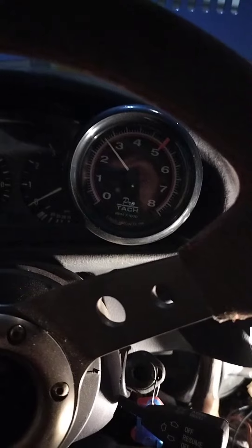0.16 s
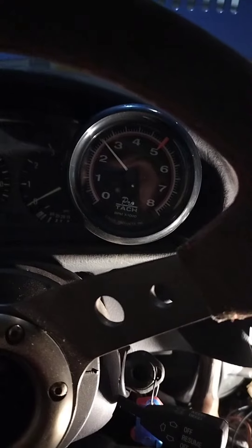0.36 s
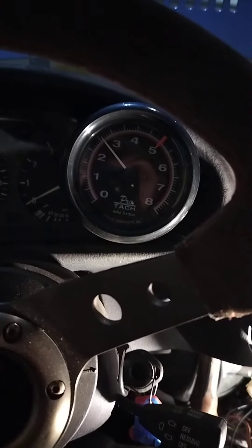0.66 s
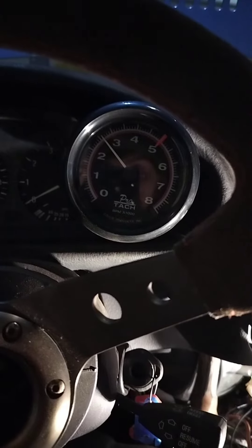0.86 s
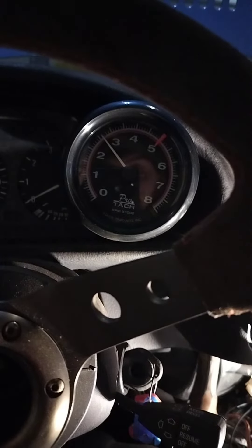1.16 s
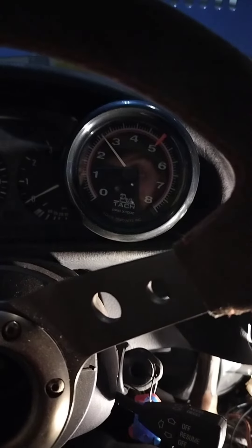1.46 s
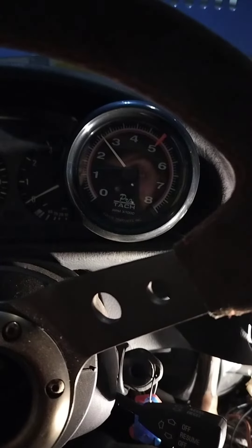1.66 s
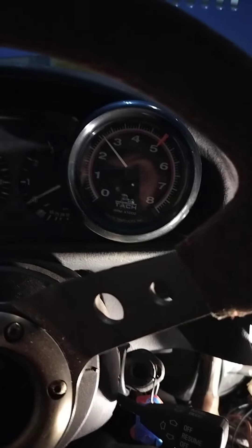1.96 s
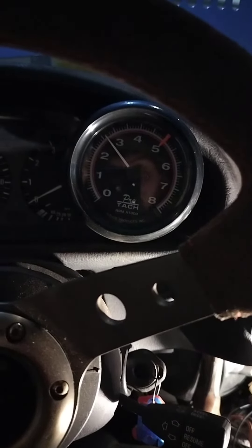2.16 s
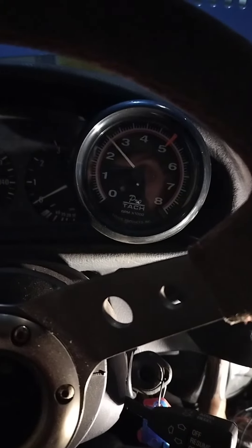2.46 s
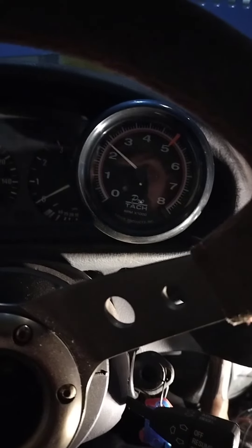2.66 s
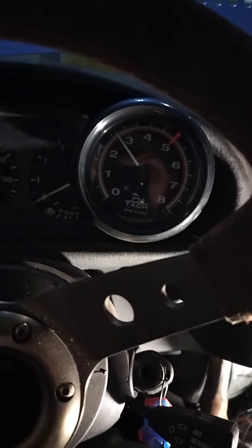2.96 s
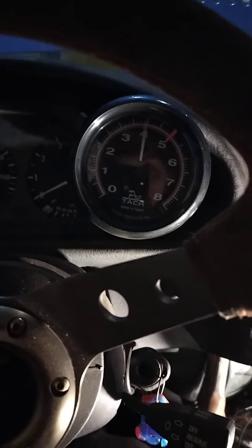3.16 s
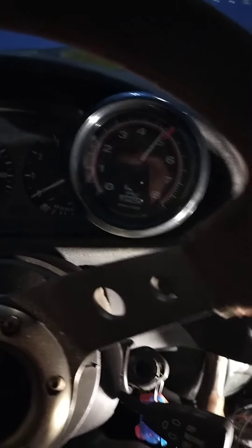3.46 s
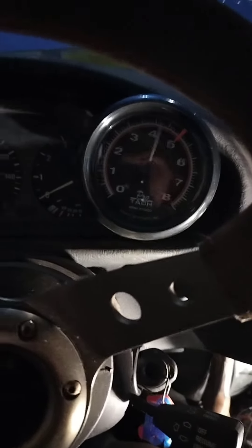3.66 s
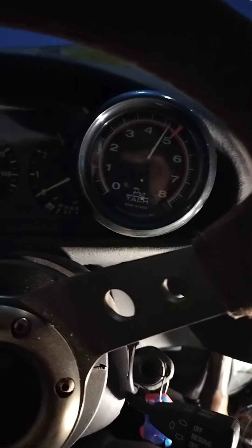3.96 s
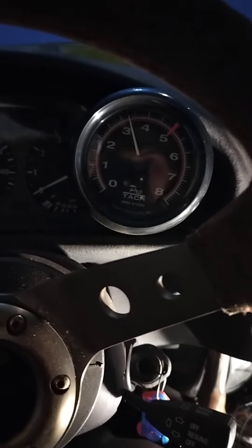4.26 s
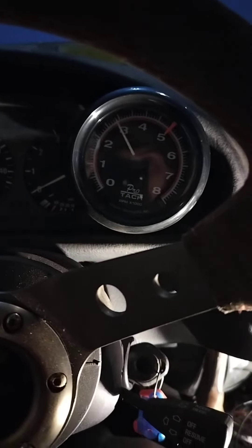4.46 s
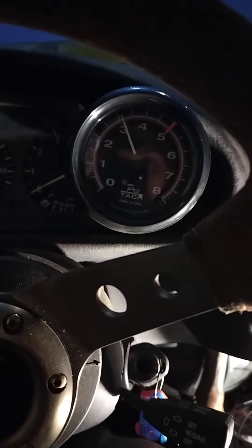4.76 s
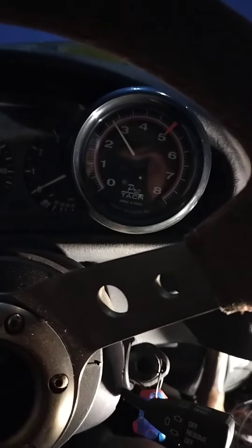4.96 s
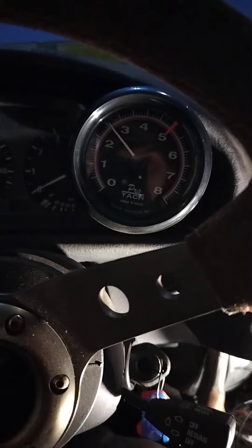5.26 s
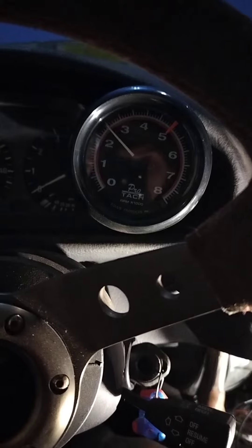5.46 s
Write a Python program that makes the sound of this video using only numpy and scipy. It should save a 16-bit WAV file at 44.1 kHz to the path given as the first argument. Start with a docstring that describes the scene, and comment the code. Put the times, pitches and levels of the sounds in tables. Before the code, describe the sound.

A lumpy V8 idle booms inside a car cabin for almost three seconds, with clattering valve gear and rushing air under the bonnet. Two short throttle blips run together, the second reaching higher, with hard exhaust bark. The pedal is released and the revs sink smoothly, the rattle and rush strongly subdued. Close stereo microphone at the seat, little echo, faint hiss.

```python
"""Driver's seat of a car: a cross-plane V8 idles lumpily, takes two quick throttle blips, then runs down.
Each bank fires unevenly into its own exhaust pipe: jittered impulses ring low modes, which boom in the cabin.
Over the boom lie exhaust rasp, valve clatter and the rush of air under the bonnet, made of noise bursts
timed to the firings plus steady noise, and a faint throttle whistle and even hiss."""
import sys
import numpy as np
from scipy import signal
from scipy.fft import rfft, irfft, next_fast_len
from scipy.io import wavfile
from scipy.ndimage import uniform_filter1d, minimum_filter1d

SR = 44100
rng = np.random.default_rng(int(sys.argv[2]) if len(sys.argv) > 2 else 0)


def inscribe(sig):
    """Save sig as 16-bit PCM at rate SR to the path in sys.argv[1].

    A 1-D sig is mono; a 2-D sig holds one channel per row.
    Samples are clipped to [-1, 1] before scaling.
    """
    pcm = np.round(np.clip(np.atleast_2d(sig).T, -1, 1) * 32767)
    wavfile.write(sys.argv[1], SR, pcm.astype(np.int16))


N = 247401
TIME = np.arange(N) / SR
SIZE = next_fast_len(N + SR // 2)
HZ = np.fft.rfftfreq(SIZE, 1 / SR) + 1e-6
IDLE_RPM = 835


def gain_of(db):
    """Decibels to amplitude."""
    return 10 ** (np.asarray(db) / 20)


def read(points, hz):
    """Interpolates a spectrum on a log-frequency axis."""
    f, value = np.transpose(points)
    return np.interp(np.log(hz + 1), np.log(f + 1), value)


def filtered(x, response):
    """Passes x through a frequency response."""
    return irfft(rfft(x, SIZE) * response, SIZE)[..., :N]


def noise():
    """White noise, independent in the two channels."""
    return rng.standard_normal((2, N))


def evened(x):
    """Scales to unit power."""
    return x / np.sqrt(np.mean(x ** 2) + 1e-20)


def resonance(hz, width_hz):
    """Response of one resonance, unity at its peak."""
    return 1 / (1 + 2j * (HZ - hz) / width_hz)


def crank_rpm(coast_s=.61):
    """Engine speed: follows the pedal, then sinks exponentially towards idle."""
    # crank speed through idle and blips: (time [s], speed [rpm])
    speed = [(0, 843), (.45, 814), (.9, 834), (2.25, 840), (2.86, 864), (2.93, 1130), (3.14, 2090),
             (3.22, 2220), (3.31, 3030), (3.41, 3750), (3.56, 3440)]
    s, rpm = np.transpose(speed)
    coast = np.exp(-np.maximum(TIME - s[-1], 0) / coast_s)
    return IDLE_RPM + (np.interp(TIME, s, rpm) - IDLE_RPM) * coast


def engine_cycles():
    """Engine cycles elapsed; a four-stroke cycle is two crank turns."""
    return np.cumsum(crank_rpm()) / SR / 120


def throttle(open_s=.106, shut_s=.076):
    """Throttle opening, 0-1: each blip opens it, holds it and lets it snap shut."""
    # stabs at the pedal: (pressed [s], released [s])
    blips = [(2.859, 3.112), (3.206, 3.377)]
    return sum(np.interp(TIME, [on, on + open_s, off, off + shut_s], [0, 1, 1, 0]) for on, off in blips)


def firings(late_cycles=0, first_cycles=.511):
    """Times and cylinder data of the eight firings in every two crank turns."""
    # firing order: (bank [0 left, 1 right], exhaust pulse [dB], early arrival by a shorter header [s],
    # valve clatter [dB before the layer's depth factor])
    cylinders = [(0.0, 0.2, 0.0013, 5.0), (1.0, 1.2, 0.0047, 1.0), (1.0, -2.0, 0.0042, -3.0),
                 (0.0, -1.9, 0.0029, 0.5), (1.0, 2.7, 0.0044, -4.0), (0.0, 3.8, 0.0007, 0),
                 (0.0, -2.2, -0.0008, 0.5), (1.0, -1.7, 0.0053, 0.5)]
    cycles = engine_cycles()
    count = np.arange(-8, int(cycles[-1] + 1) * 8)
    angle = count / len(cylinders) + first_cycles + late_cycles
    inside = (angle > 0) & (angle < cycles[-1])
    times = np.interp(angle[inside], cycles, TIME)
    return times, np.array(cylinders)[count[inside] % len(cylinders)].T


def clicks(times, sizes):
    """One impulse at each time."""
    return np.bincount(np.clip(np.round(times * SR).astype(int), 0, N - 1), sizes, N)


def puffs(train, decay_s):
    """Each impulse lets out a decaying burst of noise, different in the two channels."""
    envelope = signal.lfilter([1], [1, -np.exp(-1 / (decay_s * SR))], train)
    return evened(envelope * noise())


def loudness(idle_db, revs_db, open_db, open_revs_db, overrun_db):
    """Level of a layer [dB]: rises with revs and throttle, sinks as the shut throttle starves the engine."""
    # overrun, recovering as the engine slows: (time [s], starved [0-1])
    overrun = [(3.57, 0), (3.79, .5), (4.11, .88), (4.63, 1), (5.5, .5)]
    octaves = np.log2(crank_rpm() / IDLE_RPM)
    starved = np.interp(TIME, *np.transpose(overrun))
    return idle_db + revs_db * octaves + throttle() * (open_db + open_revs_db * octaves) + overrun_db * starved


def played(x, level_db, size=6300):
    """Imposes a level curve; smoothing over about one idle cycle keeps the throb within it."""
    power = uniform_filter1d(np.mean(np.atleast_2d(x) ** 2, axis=0), size)
    return x * gain_of(level_db) / np.sqrt(uniform_filter1d(power, size // 2) + 1e-20)


def cabin(x, colour, echo=.45, t60_s=.09):
    """Path to the seat: close reflections, ringing panels, layer colour, then the microphone pair."""
    # ringing panels and engine covers: (frequency [Hz], width [Hz], lift [dB])
    panels = [(312, 25, 3), (515, 22, 3), (619, 20, 5), (666, 18, 4), (720, 16, 3), (947, 18, 0),
              (992, 18, 3), (1041, 20, 4), (1174, 24, 4), (1221, 16, 1), (1668, 26, 5), (1738, 20, 6),
              (1926, 22, 3), (2126, 24, 5), (2424, 16, 4), (2780, 50, 3), (2928, 22, 4.5), (3612, 55, 5),
              (4360, 150, 3)]
    # level difference of the pair: (frequency [Hz], left minus right [dB])
    tilt = [(300, 3), (450, 1.5), (700, -2.5), (1290, -3), (2380, -2), (4400, 2), (7000, 3.5), (10000, 0)]
    # left-right likeness of the pair: (frequency [Hz], correlation [-1 to 1])
    same = [(130, .95), (290, .91), (640, .75), (1410, .1), (3000, 0)]
    t = TIME[:SR // 8]
    taps = rng.standard_normal((2, len(t))) * gain_of(-60 * t / t60_s)
    x = x + echo * signal.fftconvolve(x, taps / np.linalg.norm(taps[0]), axes=1)[:, :N]
    ringing = 1 + sum((gain_of(db) - 1) * resonance(hz, width) for hz, width, db in panels)
    left, right = rfft(x, SIZE) * ringing * gain_of(read(colour, HZ))
    likeness = np.clip(read(same, HZ), -1, 1)
    side = gain_of(read(tilt, HZ) / 2)
    mixed_right = likeness * left + np.sqrt(1 - likeness ** 2) * right
    return irfft(np.array([left * side, mixed_right / side]), SIZE)[:, :N]


def boom(uneven_db=1.5, jitter_s=.00025, low_hz=38, cut_hz=40, top_hz=255):
    """Exhaust pulses, no two burns alike, ring the low modes of each bank's pipe."""
    # pipe and cabin modes: (frequency [Hz], width [Hz], left-bank coupling [signed], right-bank [signed])
    modes = [(49.3, 10.1, -2.6, 4.8), (65.9, 8.6, -3.7, 5.4), (76.9, 4.0, -1.8, 1.4),
             (101.3, 16.3, -0.4, -3.3), (147.7, 20.5, -2.8, -4.1), (160.6, 21.0, 2.9, 1.3),
             (204.0, 16.5, -0.9, -0.7), (233.8, 21.2, 0.2, 0.3)]
    # level law: (idle [dB], revs [dB/octave], open throttle [dB], revs while open [dB/octave],
    # full overrun [dB])
    law = (-14.5, 1.3, 9.0, -4.3, -12.3)
    times, (bank, pulse_db, early_s, _) = firings()
    burn, timing = rng.standard_normal((len(times), 2)).T
    sizes = gain_of(pulse_db + uneven_db * burn)
    arrivals = times - early_s + jitter_s * timing
    # open pipe ends radiate no deep bass, mufflers swallow the top
    ends = 1 / (1 + low_hz / (1j * HZ)) ** 2
    ends = ends / np.sqrt((1 + (HZ / top_hz) ** 12) * (1 + (cut_hz / HZ) ** 16))
    out = 0
    for side in (0, 1):
        pipe = sum(coupling[side] / (1 + 1j * (HZ ** 2 - hz ** 2) / (HZ * width))
                   for hz, width, *coupling in modes)
        out = out + filtered(clicks(arrivals, sizes * (bank == side)), pipe * ends)
    left_right_db = [[.1], [-.1]]
    return played(tightened(out) * lope(), loudness(*law)) * gain_of(left_right_db)


def tightened(x, under_hz=60, build_s=.1, reach=1.8):
    """As gas flow builds up behind the open throttle, the boom loses its deepest throb."""
    keep = np.exp(-1 / (build_s * SR))
    flow = np.minimum(reach * signal.lfilter([1 - keep], [1, -keep], throttle()), 1)
    return x - flow ** 2 * filtered(x, 1 / (1 + (HZ / under_hz) ** 8))


def lope(depth_db=1.0, loudest_cycles=.88, gone_rpm=1000):
    """Gain of the idle surge, once a cycle; it evens out as the revs rise."""
    rpm = crank_rpm()
    depth = depth_db * np.interp(rpm, [rpm.min(), gone_rpm], [1, 0])
    return gain_of(depth * np.cos(2 * np.pi * (engine_cycles() - loudest_cycles)))


def rasp(uneven_db=1.6, sharp=.5, sharp_rpm=2000, decay_s=.012, steady=.7, far_bank_db=-3):
    """Turbulent puff behind each exhaust pulse; with revs the pulse edge hardens and the mufflers bark."""
    # muffler resonances that open up with the revs: (frequency [Hz], width [Hz], relative level [dB])
    bark = [(192, 45, 0), (375, 70, -7), (515, 60, -10), (750, 140, -9), (1030, 200, -14)]
    # colour: (frequency [Hz], relative level [dB])
    colour = [(130, -22), (195, 0), (240, -5), (280, -6), (350, -1.5), (420, -2.5), (520, -5), (590, -6),
              (720, -5), (850, -6.5), (1020, -7), (1300, -12), (1690, -26), (2860, -80)]
    # level law: (idle [dB], revs [dB/octave], open throttle [dB], revs while open [dB/octave],
    # full overrun [dB])
    law = (-33.4, 5.8, 7.0, -1.5, -16.8)
    times, (bank, *_) = firings()
    train = clicks(times, gain_of(far_bank_db * bank + uneven_db * rng.standard_normal(len(times))))
    drive = crank_rpm() / sharp_rpm
    gas = sharp * drive * evened(train) + puffs(train, decay_s) + steady * noise()
    mufflers = sum(gain_of(db) * resonance(hz, width) for hz, width, db in bark)
    return played(cabin(gas + filtered(gas * drive ** 2, mufflers), colour), loudness(*law))


def valves(colour, tick, decay_s, steady, depth, uneven_db=2.0):
    """Valve gear ticks and rattles once a cylinder, one louder than the rest, in a steady rush of fan air."""
    times, (*_, clatter_db) = firings(late_cycles=.03)
    train = clicks(times, gain_of(depth * clatter_db + uneven_db * rng.standard_normal(len(times))))
    gear = tick * puffs(train, decay_s=.0012) + puffs(train, decay_s)
    return flaring(cabin(gear + steady * noise(), colour))


def flaring(x, patchy_db=1.2):
    """The rattle flares up in short patches, now at one pitch, now at another."""
    z = signal.stft(x, nperseg=512)[2]
    patches = uniform_filter1d(rng.standard_normal(z.shape[1:]), size=9, axis=0)
    patches = uniform_filter1d(patches, size=9, axis=1)
    return signal.istft(z * gain_of(patchy_db * evened(patches)), nperseg=512)[1][:, :N]


def clatter():
    """Valve clatter: ticks and rattle in the mid treble."""
    # colour: (frequency [Hz], relative level [dB])
    colour = [(680, -12), (1150, -2.8), (1430, -4), (1680, -1.5), (1840, -5), (2510, -1.5), (2580, -2.5),
              (3100, -10.5), (4030, -35), (6820, -120)]
    # level law: (idle [dB], revs [dB/octave], open throttle [dB], revs while open [dB/octave],
    # full overrun [dB])
    law = (-30.8, 2.5, 10.6, -1.8, -19.8)
    return played(valves(colour, tick=.2, decay_s=.014, steady=1.1, depth=.7), loudness(*law))


def air():
    """Rush of air under the bonnet, pulsing with the valve gear in the high treble."""
    # colour: (frequency [Hz], relative level [dB])
    colour = [(1710, -29), (2900, -4.5), (3360, -2.5), (3580, -2), (3890, -1.5), (4240, -1.5), (5120, -3),
              (6230, -4), (7420, -10.5), (8720, -22.5), (11800, -22), (14100, -26.5), (15500, -31)]
    # level law: (idle [dB], revs [dB/octave], open throttle [dB], revs while open [dB/octave],
    # full overrun [dB])
    law = (-30.3, .9, 10.0, -.4, -23.4)
    return played(valves(colour, tick=.22, decay_s=.022, steady=.8, depth=1.2), loudness(*law))


def whistle(hz=2790, width_hz=130, level_db=-59):
    """Faint airy whistle of the nearly shut throttle: narrow-band noise, constant in level."""
    return gain_of(level_db) * evened(filtered(noise(), 1 / (1 + (2 * (HZ - hz) / width_hz) ** 2)))


def hiss(level_db=-71):
    """Faint even background hiss: white noise."""
    return gain_of(level_db) * noise()


def scene():
    """Engine layers share one crank and throttle, over whistle and hiss."""
    return boom() + rasp() + clatter() + air() + whistle() + hiss()


def record(dry, ceiling=.97, edge_hz=15600):
    """A smoothed limiter holds the peaks under full scale; a low-pass then limits the band."""
    room = np.minimum(1, ceiling / (abs(dry).max(axis=0) + 1e-9))
    limited = dry * uniform_filter1d(minimum_filter1d(room, size=600), size=600)
    lowpass = signal.firwin(511, edge_hz, window=("kaiser", 9), fs=SR)
    return signal.oaconvolve(limited, lowpass[None], "same")


dry = scene()
out = record(dry)
inscribe(out)
```